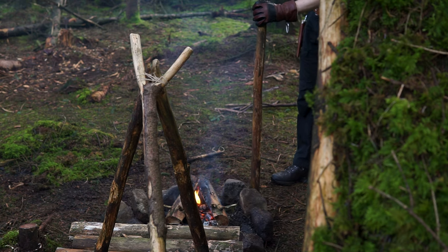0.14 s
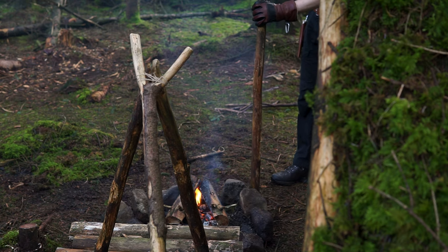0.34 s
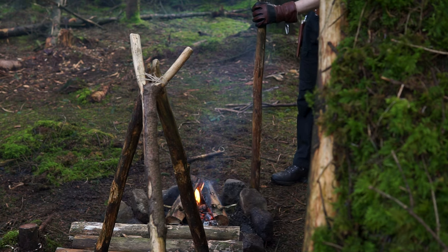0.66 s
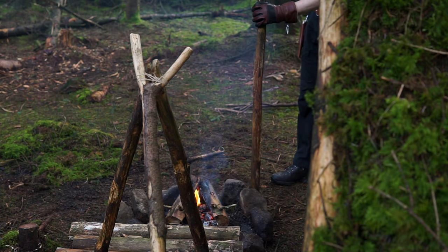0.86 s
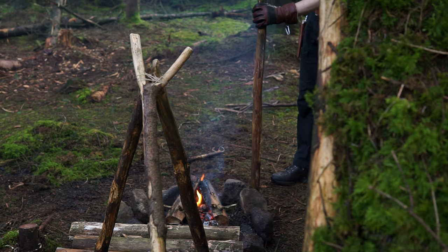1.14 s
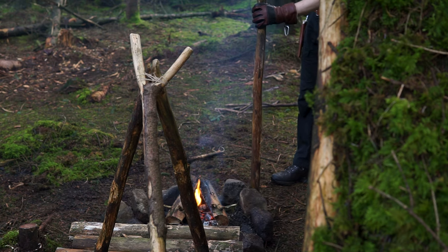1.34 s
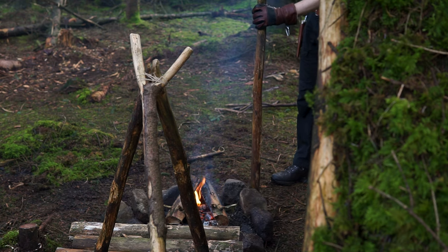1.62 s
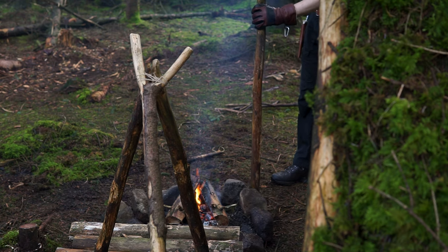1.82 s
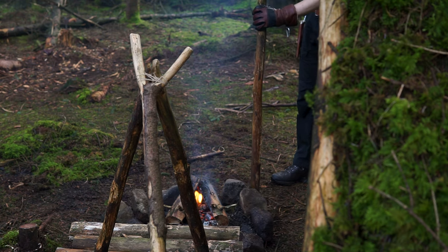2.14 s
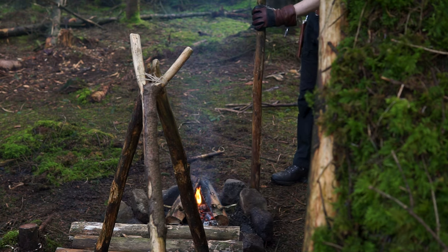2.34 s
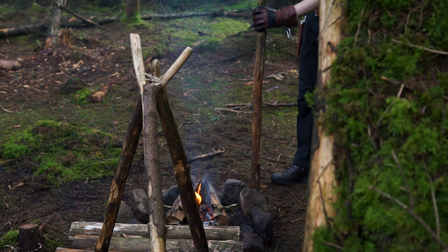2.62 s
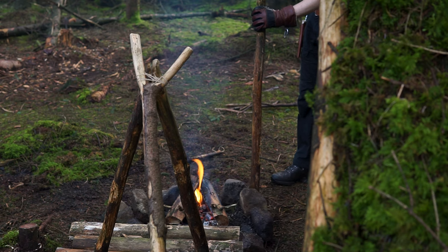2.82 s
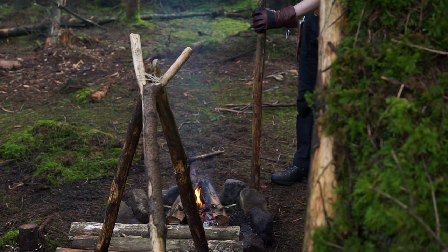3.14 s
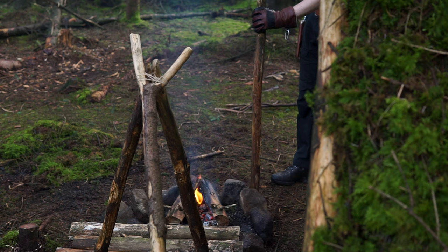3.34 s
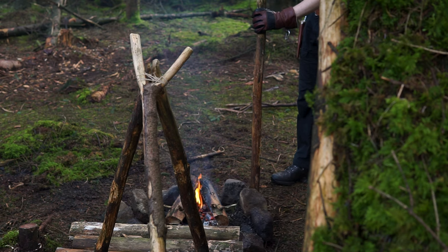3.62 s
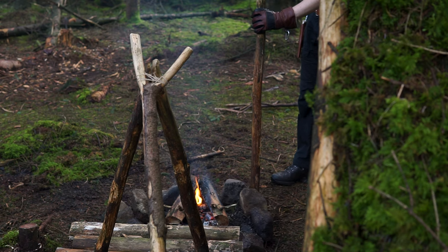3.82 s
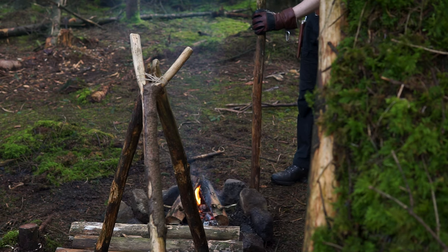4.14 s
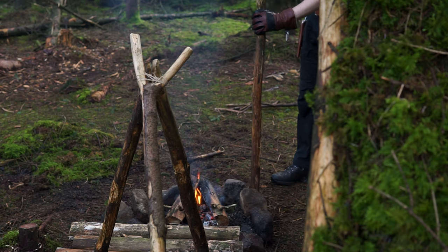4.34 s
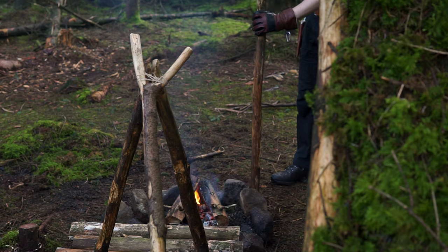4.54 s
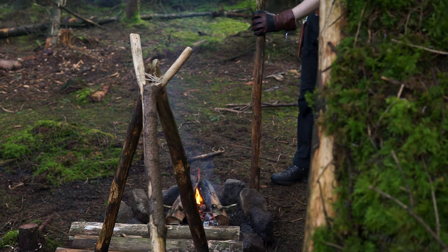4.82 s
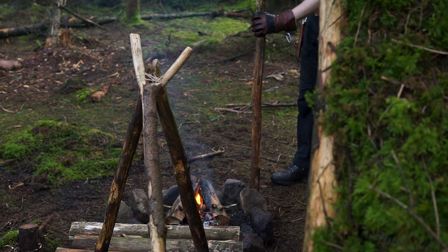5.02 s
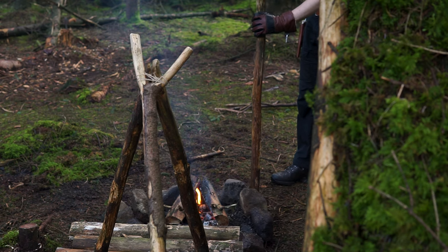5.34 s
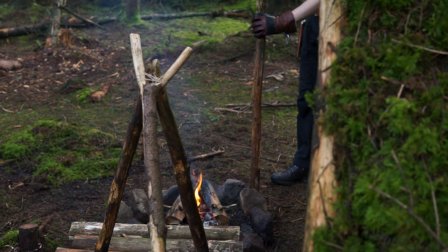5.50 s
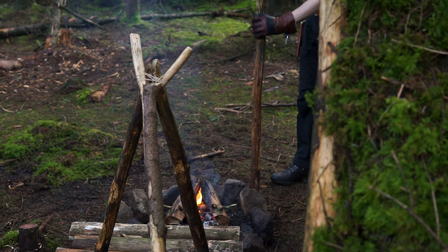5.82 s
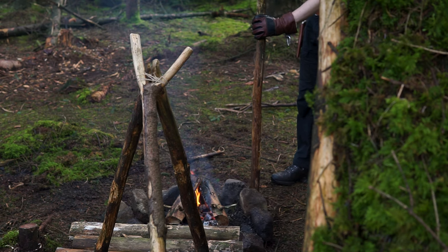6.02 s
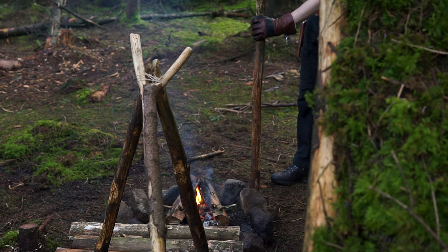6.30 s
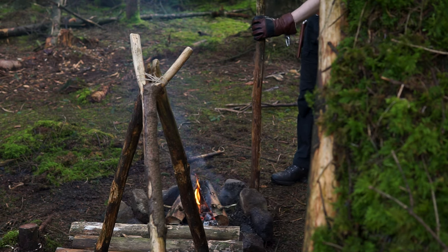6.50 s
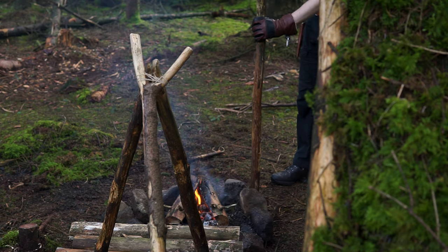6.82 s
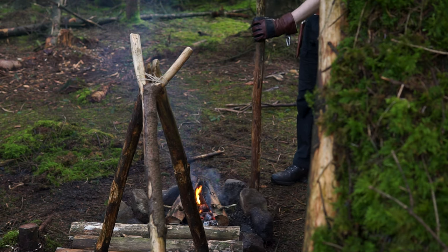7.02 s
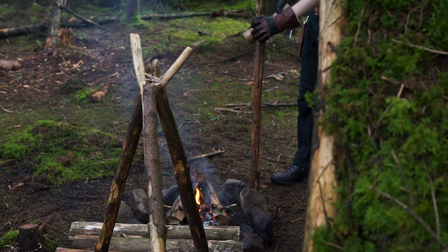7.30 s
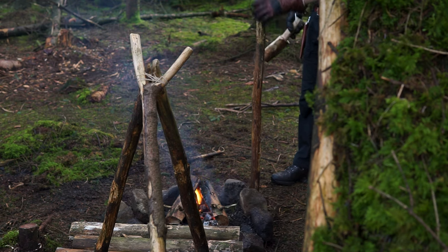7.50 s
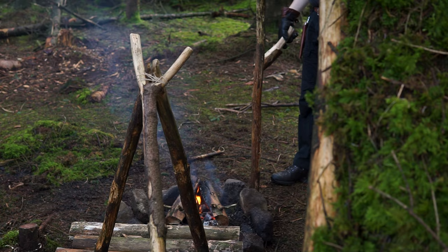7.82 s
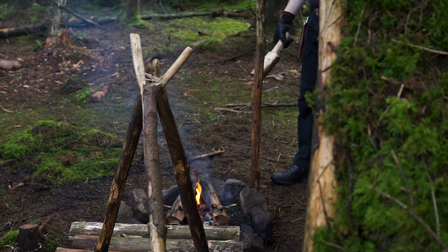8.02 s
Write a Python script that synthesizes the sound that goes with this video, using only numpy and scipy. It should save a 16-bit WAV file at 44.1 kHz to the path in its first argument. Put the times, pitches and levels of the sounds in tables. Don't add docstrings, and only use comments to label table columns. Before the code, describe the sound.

A close stereo microphone in a forest clearing hears a wooden mallet drive a long stake into the ground. From 0.15 to 6.86 seconds, fifteen blows fall at an even pace, one every 0.48 seconds, slightly right of centre. Each is a sudden, hollow mid-pitched wood knock, overloaded and flattened, with a splitting crack, very short ring and crunch of soil and twigs. A dull, softer bounce follows most by about 0.04 seconds, and a wide tree echo swells and dies within half a second. Blows near 3.0 and 4.0 are strongest; those near 5.9 and 6.4 are duller with a fibrous hiss. Campfire ticks, snaps and tocks scatter throughout, with sharp pops near 2.1 and 3.6, over low wind and flame hush. From 7.5 to 8.1, sleeve and glove rub faintly; a bright pop comes at 7.8.

```python
import sys
import numpy as np
from scipy import signal
from scipy.io import wavfile
from scipy.ndimage import uniform_filter1d

SR = 44100
rng = np.random.default_rng(int(sys.argv[2]) if len(sys.argv) > 2 else 0)


def undo_db(level):
    steps = np.asarray(level, float) / 20
    return 10 ** steps


def wrap_up_sound(samples):
    columns = np.atleast_2d(samples).T
    tamed = np.clip(columns, -1, 1)
    steps = np.round(tamed * 32767).astype(np.int16)
    wavfile.write(sys.argv[1], SR, steps)


N = 359856

# [f/Hz, level/dB per Hz]
HUSH_COLOUR = [(15, -5.5), (28, 7.5), (60, 3), (130, 2.5), (256, 3.5), (340, 5.5), (450, 0.5), (1040, -6.5),
               (2910, -23.5), (5500, -25), (7200, -28), (8800, -24.5), (12500, -24), (16000, -33)]
# [t/s, level/dB]
HUSH_LEVEL = [(0, -54.5), (2, -53), (4, -53), (6, -55.5), (7.2, -55), (8.2, -55)]
# [f/Hz, likeness 0-1]
HUSH_LIKENESS = [(60, 0.53), (240, 0.82), (950, 0.26), (3770, 0.56), (15000, 0.19)]

# [t/s, peak level/dB, colour f/Hz, left-right/dB]
CRACKLES = [(0.291, -44, 4110, -3), (0.9625, -43, 8530, 1.0), (1.844, -43, 10500, -1.5),
            (1.938, -47, 8600, 0), (1.985, -37, 8750, -1.5), (2.9255, -38.5, 8310, -3),
            (3.017, -36, 5520, 0.6), (3.525, -30.5, 13400, 0), (3.5563, -19.5, 4950, 4),
            (3.5782, -33.5, 10800, 0.2), (3.6085, -42, 4950, 0.2), (3.7787, -40, 10450, 0.4),
            (3.9069, -40, 5060, 1.5), (4.6208, -37, 9200, 5), (5.4103, -36, 5400, -5),
            (5.5802, -26.5, 5140, -1), (5.619, -40.5, 10180, -0.2), (5.8272, -34.5, 8980, -3),
            (5.895, -42, 9000, -.4), (6.4795, -29.5, 5020, 6), (6.6008, -49, 9210, -2.06),
            (6.729, -36, 10800, -2), (7.051, -36, 10500, 1), (7.1981, -45, 9620, -0.4),
            (7.2997, -44, 5700, 0.4)]
# [t/s, peak level/dB, left-right/dB]
SNAPS = [(0.358, -53, 3), (.85, -47, .4), (1.189, -33, -2.5), (1.3453, -44, 1), (1.9928, -34.5, 1.2),
         (2.0466, -43.5, .4), (2.1169, -18, 5), (2.3033, -49, 0), (2.742, -54, 2), (3.8113, -47.5, 1.2),
         (4.363, -48, 2.2), (4.306, -52, .4), (.902, -53, .4), (7.9962, -57, .4), (6.27, -52.5, .4),
         (1.308, -52, .4), (1.57, -50, .4), (1.826, -52, .4), (1.668, -42, .4), (5.2778, -53.5, 3.5),
         (5.71, -54, .4), (6.109, -44.5, .4), (6.418, -34.5, .4), (6.7083, -46.5, .4), (7.012, -34.5, 1.5),
         (7.286, -48, 8.5), (7.3497, -53, -2), (7.6616, -50, .4)]
# [t/s, peak level/dB, colour f/Hz, left-right/dB]
POPS = [
    (3.463, -32, 7450, 0.5),
    (3.6245, -11.5, 5350, 3),
    (4.3558, -32, 8300, 2.2),
    (7.8405, -26, 10700, 1.5),
]
# [t/s, peak level/dB, colour f/Hz]
TOCKS = [
    (1.022, -47, 1380),
    (2.463, -51, 1270),
    (2.897, -45.5, 1820),
    (2.951, -45, 1200),
    (5.428, -45.5, 2500),
    (7.748, -52, 1400),
    (7.386, -44, 700),
]
# [t/s, peak level/dB, colour f/Hz]
PINGS = [
    (.5989, -48, 12020),
    (3.9522, -54, 9920),
    (4.8395, -48, 5880),
    (5.2778, -52.5, 12100),
    (5.862, -53.5, 12300),
    (7.5072, -55, 5220),
    (7.5596, -52, 11800),
    (7.578, -32, 10400),
    (7.6101, -54, 10300),
]
RING_WIDE, SNAP_WIDE, POP_WIDE, PING_WIDE = 0.2, 0.58, 0.39, .04
SNAP_HZ = 6900
THIN_HZ, FULL_HZ = 3000, 907
BURST_T60_S, T60_GROWS_DB = 0.0078, 90

# [peak t/s, peak level/dB, length/s, share of leather against cloth 0-1]
RUBS = [
    (7.497, -62, 0.088, .28),
    (7.688, -53, .08, .2),
    (7.742, -63, .06, .3),
    (7.86, -68, 0.22, 0.16),
    (7.971, -64, .05, .6),
    (8.035, -55, .08, 0.83),
    (8.096, -49.5, 0.037, 1),
    (8.132, -57, .06, 0.55),
]
# [f/Hz, level/dB per Hz]
CLOTH = [(350, -30), (1000, -3.5), (2000, 1), (2800, -7), (3700, -3.5), (5000, -12), (9000, -20),
         (16000, -48)]
# [f/Hz, level/dB per Hz]
LEATHER = [(500, -25), (1100, -4), (1600, -0.5), (2100, -7), (3500, -24), (8000, -38), (16000, -60)]
RUB_RISE, RUB_FALL_DB = .3, 16.5

# [t/s, level/dB]
SKIDS = [
    (5.915, -47),
    (6.3881, -47),
]
# [f/Hz, level/dB per Hz]
RASP = [(3000, -27.5), (4300, -5.5), (5200, -0.5), (6800, -1.5), (7900, -13), (12000, -28)]
RASP_RISE_S, RASP_T60_S = .012, 0.44

# [f/Hz, level/dB per Hz]
ECHO_COLOUR = [(59, -38), (100, -15.5), (250, -10), (433, -2.5), (705, 1), (1050, 0.5), (1450, -6),
               (1900, -11.5), (2300, -18.5), (3390, -22), (6000, -23), (10400, -24.5), (16000, -46.5)]
# [f/Hz, t60/s]
ECHO_T60 = [(200, 0.87), (530, 0.47), (1390, 0.54), (2500, .66), (4500, 0.52), (6500, 0.27), (9700, 0.25),
            (15000, 0.41)]
ECHO_TOP_HZ, CRACK_DB_PER_OCTAVE, ABOVE_TOP_DB = 11500, 9.5, 8

# [t/s of the main swing, peak level/dB, lead-in/s, longer for a harder touch]
BOUNCES = [(.1985, -27.5, 0.0013), (.6764, -13, .0015), (1.1657, -21, 0.0013), (1.6338, -14, 0.0013),
           (2.1112, -17.5, 0.0012), (2.5948, -16, 0.0018), (3.076, -9.5, .0021), (4.0486, -12, 0.0032),
           (4.5355, -23.5, .0011), (5.4997, -24.5, 0.00094), (5.983, -30, 0.0011), (6.461, -24, .0023),
           (6.914, -19, 0.00074)]
TOUCH_HZ, LEAVE_HZ, BOUNCE_T60_S = 493, 287, .015
HARD_HZ, HARD_PER_MS = 950, 0.21

# [f/Hz, level/dB, t60/s]
SHAFT_MODES = [(130, -10.5, 0.039), (265, -7, 0.059), (351, -9, 0.077), (400, -13.5, .05), (1439, -13, .06),
               (1590, -16, 0.035), (1730, -9, 0.062), (1857, -14.5, 0.058), (1972, -16, .06),
               (2200, -19.5, 0.016)]
PRESS_S, PRESS_LOW_DB, PRESS_HIGH_DB = .007, 1.14, 5
GRIP_S, GRIP_DB, GRIP_HZ = .0155, -6, 1200

# [t/s, level/dB, high-low balance of modes/dB per octave, treble crack/dB, soil and twig shake/dB]
BLOWS = [(0.1524, -0.95, -0.1, -6.5, -5.5), (0.635, -0.14, -1, -2.5, 3), (1.1145, 0.34, 0.43, -2.5, -2.5),
         (1.5839, -0.74, -0.1, -1.5, -4), (2.0676, -0.1, 2.3, -2.5, -0.5), (2.546, -0.33, 1, -3.5, 0),
         (3.028, 1.36, 1.5, 0, 6), (3.51, -2.5, -2.25, -6, -6), (3.9984, 1.8, -0.14, 0.9, 8),
         (4.481, -2.33, -2.46, -3, -1.5), (4.9639, -3.5, -1.75, -2, -6.5), (5.4388, -0.2, -1.5, -1, 4.5),
         (5.915, -3, -2.5, -5, -4.5), (6.3884, -3, -2.05, -5.5, -5.5), (6.8604, -1.86, -1.3, -1.5, -2)]
# [f/Hz, level/dB, t60/s, sign of the first swing]
WOOD_MODES = [(205.5, -13, 0.097, -1), (330, -0.27, 0.055, 1), (530.3, -0.9, 0.045, -1),
              (643.5, 22, 0.013, 1), (680, 8.5, 0.032, -1), (952.4, 17.5, 0.02, -1), (895, -5, 0.047, -1),
              (1053.4, 9, 0.036, -1), (1369, -7, 0.049, -1), (1430, 0.53, 0.035, -1), (1582, -5.5, 0.03, 1),
              (1641, -6.0, 0.042, 1), (2015.5, 3, 0.02, 1), (2550, -25.5, 0.036, -1)]
# [f/Hz, level/dB per Hz]
CRACK_COLOUR = [(800, -19), (1700, -6), (2600, -11.5), (4000, -2.5), (8000, -11.5), (15000, -19.5)]
# [f/Hz, level/dB per Hz]
CRUNCH_COLOUR = [(180, -26), (300, -3.5), (899, 0.1), (2210, -16.5), (4080, -28.5), (7430, -29.5),
                 (10900, -36.5), (16000, -56.5)]
# [left delay/s, left gain, right delay/s, right gain]
NEAR_PATHS = [(0.00016, 0.72, 0.00016, 1.12), (0.00074, 0.13, 0.0069, 0.11),
              (0.00443, -0.09, 0.00967, -0.12), (0.00615, -0.16, 0.01213, 0.06),
              (0.00872, -0.08, 0.01535, -0.05), (0.01204, 0.06, 0.01735, 0.04),
              (0.01519, -0.02, 0.02142, -0.02), (0.0224, -0.02, 0.02356, -0.03)]
CRUNCH_DB, CRUNCH_PER_SHAKE = -1, .45


def evened(x):
    return x / np.sqrt(np.mean(x ** 2) + 1e-20)


def read(points, hz):
    f, value = np.transpose(points)
    return np.interp(np.log(hz + 1), np.log(f + 1), value)


def add(mix, s, sound):
    part = mix[..., round(s * SR):][..., :sound.shape[-1]]
    part += sound[..., :part.shape[-1]]


def sides(pan_db):
    return undo_db(np.array([[.5], [-.5]]) * pan_db)


def noise(colour, length, same, patchy_db, size=512):
    hz = np.fft.rfftfreq(size, 1 / SR)
    a, b, c, d, patches = rng.standard_normal((4 * length // size + 5, len(hz), 5)).T
    patches = uniform_filter1d(patches, size=size // 100, axis=0)
    patches = evened(uniform_filter1d(patches, size=8192 // size, axis=1))
    left, other = a + 1j * b, c + 1j * d
    z = np.array([left, same * left + np.sqrt(1 - same ** 2) * other])
    z = z * undo_db(read(colour, hz)[:, None] + patchy_db * patches)
    sound = signal.istft(z, nperseg=size, noverlap=3 * size // 4)[1]
    return evened(sound[:, :length])


def hush():
    same = read(HUSH_LIKENESS, np.fft.rfftfreq(2048, 1 / SR))[:, None]
    t = np.arange(N) / SR
    gusts_hz = np.geomspace(.3, 6, num=16)
    swell = evened(sum(np.sin(2 * np.pi * (f * t + rng.random())) / np.sqrt(f) for f in gusts_hz))
    level_db = np.interp(t, *np.transpose(HUSH_LEVEL)) + 0.62 * swell
    return undo_db(level_db) * noise(HUSH_COLOUR, N, same, patchy_db=0.84, size=2048)


def embers():
    out = np.zeros((2, N))
    for band_hz, pan_db in (((4500, 7000), 3), ((7500, 10500), -1.5), ((9500, 14000), 2.5)):
        strength_db = -54 + 4.5 * np.minimum(rng.exponential(1, N), 3)
        ticks = undo_db(strength_db) * (rng.random(N) < 18 / SR)
        band = signal.butter(2, band_hz, "band", fs=SR, output="sos")
        out += signal.sosfilt(band, ticks) * sides(pan_db)
    return out


def crackle(db, hz, pan_db, t60, wide, low_hz):
    t = np.arange(SR // 20) / SR
    band = signal.butter(2, (3500, 12000), "band", fs=SR, output="sos")
    puff = signal.sosfilt(band, rng.standard_normal((2, len(t))))
    sharp = undo_db(-60 * t / .0009) * np.sin(2 * np.pi * 8000 * t)
    snap = .25 * undo_db(-60 * t / (.5 * t60)) * puff[0] - sharp
    ring = -.6 * undo_db(-60 * t * hz / 18) * np.sin(2 * np.pi * hz * t)
    ring = ring * (1 - np.exp(-t / .0002))
    spray = undo_db(-27 - 60 * t / 0.03) * uniform_filter1d(puff, size=3)
    burst = wide * snap + (1 - wide) * ring + spray
    low_cut = signal.butter(2, low_hz, "high", fs=SR, output="sos")
    return undo_db(db + 6.5) * sides(pan_db) * signal.sosfilt(low_cut, burst)


def rustle():
    s, db, length, dull = np.transpose(RUBS)[:, :, None]
    t = np.arange(7.3, N / SR, 1 / SR)
    u = (t - s) / length
    rub = undo_db(db - RUB_FALL_DB * np.where(u < 0, -u / RUB_RISE, u))
    grain = evened(undo_db(3.1 * evened(uniform_filter1d(rng.standard_normal(len(t)), size=120))))
    cloth = noise(CLOTH, len(t), same=.8, patchy_db=2.5)
    leather = noise(LEATHER, len(t), same=.8, patchy_db=2.5)
    return t[0], grain * ((dull * rub).sum(axis=0) * leather + ((1 - dull) * rub).sum(axis=0) * cloth)


def skid(db):
    t = np.arange(SR // 2) / SR
    shape = undo_db(db - 60 * t / RASP_T60_S) * (1 - np.exp(-t / RASP_RISE_S))
    return shape * noise(RASP, len(t), same=.55, patchy_db=2.5)


def forest(db, treble_db, top_hz):
    hz, t, z = signal.stft(noise(ECHO_COLOUR, SR, same=0.33, patchy_db=1.0), SR, nperseg=256)
    bright_db = treble_db * np.clip(np.log2(hz / 2600 + 1e-3), 0, 1.2)
    bright_db = bright_db - ABOVE_TOP_DB / (1 + (top_hz / (hz + 1)) ** 16)
    rise_s = np.where(hz > 2300, .02, .06)[:, None]
    swell = 1 - np.exp(-(t / rise_s) ** 2)
    fall_db = 60 * t / read(ECHO_T60, hz)[:, None]
    z = z * swell * undo_db(db - 26.5 + bright_db[:, None] - fall_db)
    return signal.istft(z, SR, nperseg=256)[1]


def bounce(db, lead_s):
    t = np.arange(SR // 20) / SR - .005
    turns = np.where(t < 0, TOUCH_HZ, LEAVE_HZ) * t - .08
    shape = np.where(t < 0, np.exp(-(t / lead_s) ** 4), undo_db(-60 * t / BOUNCE_T60_S))
    hard = HARD_PER_MS * np.clip(1000 * lead_s - 1, 0, 2) * np.exp(-((t + lead_s / 2) / lead_s) ** 2)
    knock = np.cos(2 * np.pi * turns) + hard * np.sin(2 * np.pi * HARD_HZ * t)
    return undo_db(db + 1.5) * shape * knock * sides(-.4)


def grip(t, hz):
    high, closed = hz > GRIP_HZ, np.clip((t - GRIP_S) / .0012, 0, 1)
    pressed = np.clip((t - PRESS_S) / (GRIP_S - PRESS_S), 0, 1)
    fed_db = np.where(high, PRESS_HIGH_DB, PRESS_LOW_DB) * pressed
    return undo_db(fed_db * (1 - closed) + GRIP_DB * high * closed)


def shaft(db):
    t = np.arange(SR // 5) / SR
    hz, mode_db, t60 = np.transpose(SHAFT_MODES)[:, :, None]
    phase = 2 * np.pi * rng.random(hz.shape) + hz / 1500 * rng.standard_normal((2, *hz.shape))
    level_db = db + mode_db + 1.5 * rng.standard_normal(hz.shape) - 60 * t / t60
    lean = undo_db(np.array([-3.5, 2.5])[:, None, None] * (hz < 450))
    modes = lean * grip(t, hz) * undo_db(level_db) * np.sin(2 * np.pi * hz * t + phase)
    return modes.sum(axis=1) * (1 - np.exp(-t / 0.00088))


def blow(db, crack_db, tilt_db, crunch_db):
    t = np.arange(SR // 4) / SR
    hz, mode_db, t60, sign = np.transpose(WOOD_MODES)[:, :, None]
    hz = hz * (1 + .003 * rng.standard_normal(hz.shape))
    level_db = mode_db + tilt_db * np.log2(hz / 800) + .5 * rng.standard_normal(hz.shape)
    rise = 1 - np.exp(-t / (.003 * (326 / hz) ** 4))
    modes = sign * grip(t, hz) * rise * undo_db(level_db - 60 * t / t60) * np.sin(2 * np.pi * hz * t)
    crack = noise(CRACK_COLOUR, len(t), same=0.41, patchy_db=4.5)
    crack = undo_db(crack_db - 8.5 - 60 * t / 0.034) * sides(9.4) * crack
    contact = 1 - np.exp(-t / .0006)
    direct = undo_db(db) * (modes.sum(axis=0) + crack) * contact
    settle = undo_db(-60 * t / .14) * (1 - np.exp(-t / .003))
    heard = undo_db(crunch_db - 15.0) * settle * noise(CRUNCH_COLOUR, len(t), same=0.45, patchy_db=2.0)
    dulled = uniform_filter1d(direct, size=3)
    for k, (left_s, left, right_s, right) in enumerate(NEAR_PATHS):
        path = dulled if k else direct
        add(heard[0], left_s + 1 / SR, left * path[0])
        add(heard[1], right_s, right * path[1])
    return heard


def scene():
    mix = hush()
    bursts = [(*row, RING_WIDE, THIN_HZ) for row in CRACKLES]
    bursts += [(*row, POP_WIDE, FULL_HZ) for row in POPS]
    bursts += [(s, db, SNAP_HZ, pan_db, SNAP_WIDE, THIN_HZ) for s, db, pan_db in SNAPS]
    bursts += [(*row, 2, PING_WIDE, THIN_HZ) for row in PINGS]
    bursts += [(*row, 0, 0, FULL_HZ) for row in TOCKS]
    for s, db, hz, pan_db, wide, low_hz in bursts:
        t60 = BURST_T60_S * 10 ** ((db + 40) / T60_GROWS_DB)
        add(mix, s + 0.00087, crackle(db, hz, pan_db, t60, wide, low_hz))
    add(mix, *rustle())
    for s, db in SKIDS:
        add(mix, s, skid(db))
    for s, db, lead_s in BOUNCES:
        add(mix, s - .005, bounce(db, lead_s))
    for s, db, tilt_db, crack_db, shake_db in BLOWS:
        add(mix, s, blow(db, crack_db, tilt_db, CRUNCH_DB + CRUNCH_PER_SHAKE * shake_db))
        add(mix, s, shaft(db))
        add(mix, s, forest(db, shake_db, ECHO_TOP_HZ * 2 ** (crack_db / CRACK_DB_PER_OCTAVE)))
    return mix + embers()


def roll_off(x):
    return signal.sosfilt(signal.butter(12, 16120, fs=SR, output="sos"), x)


def record(dry):
    clipped = np.clip(dry, -1, 1)
    sagged = undo_db(.8) * signal.lfilter(*signal.butter(1, 365, "high", fs=SR), clipped)
    band_limit = signal.firwin(255, 15900, window=("kaiser", 5), fs=SR)[None]
    band = signal.oaconvolve(sagged, band_limit, "same")
    return roll_off(np.clip(band, -1, 1))


dry = scene()
out = record(dry)
wrap_up_sound(out)
```